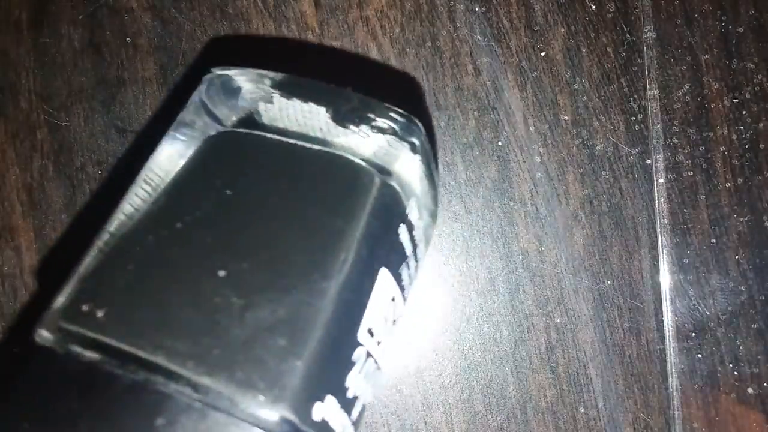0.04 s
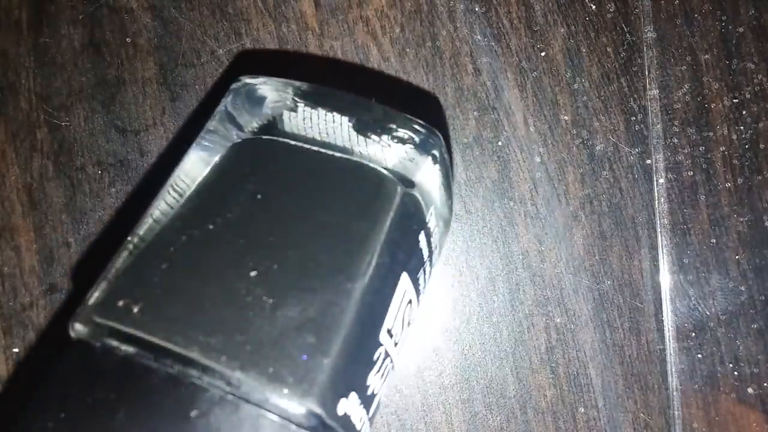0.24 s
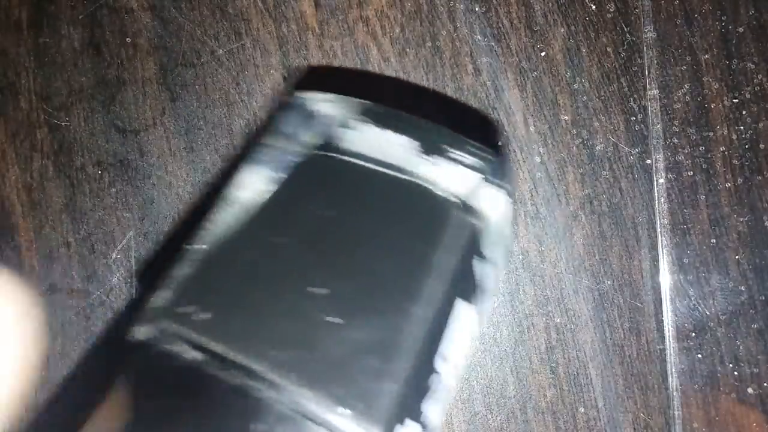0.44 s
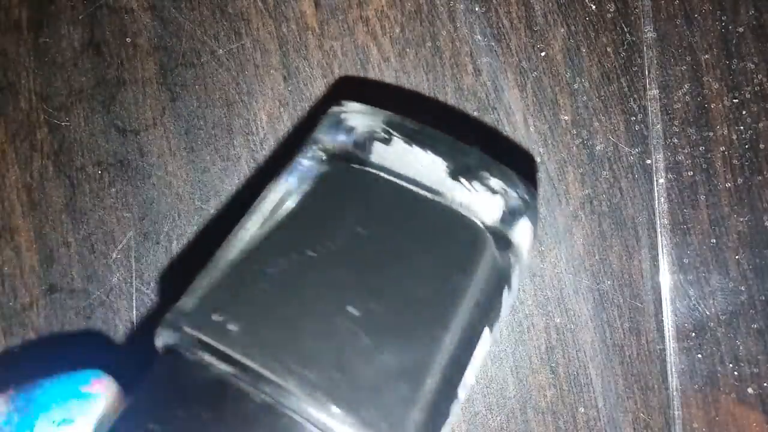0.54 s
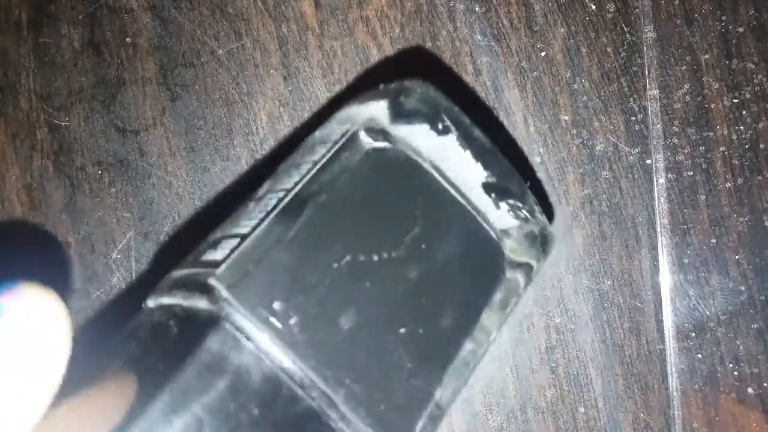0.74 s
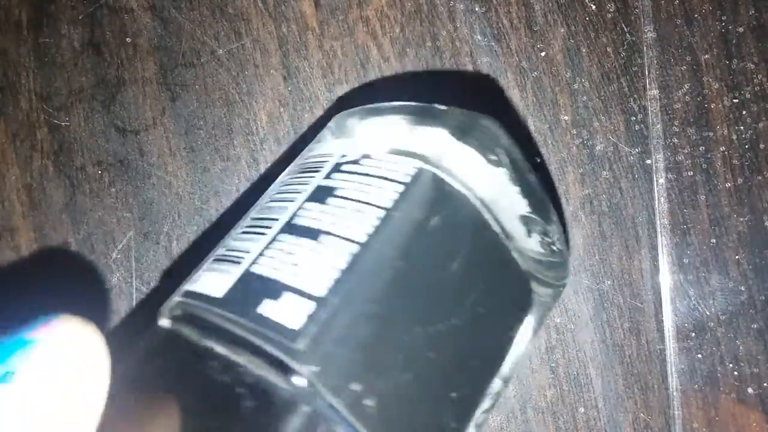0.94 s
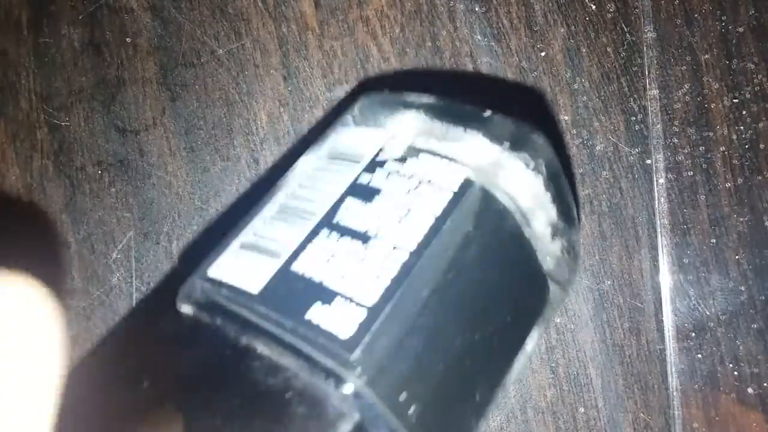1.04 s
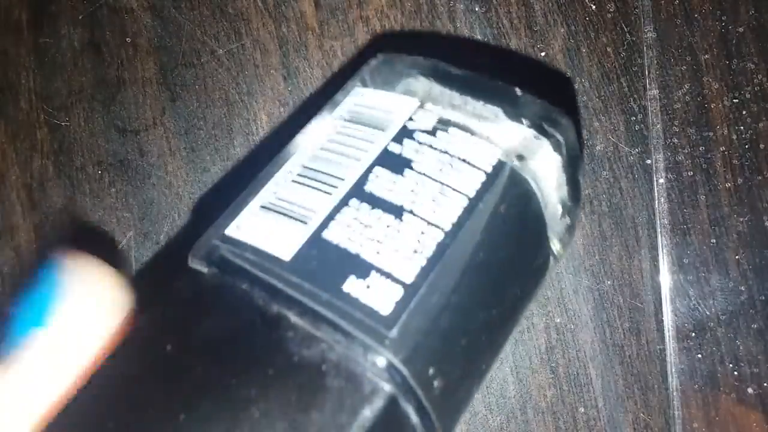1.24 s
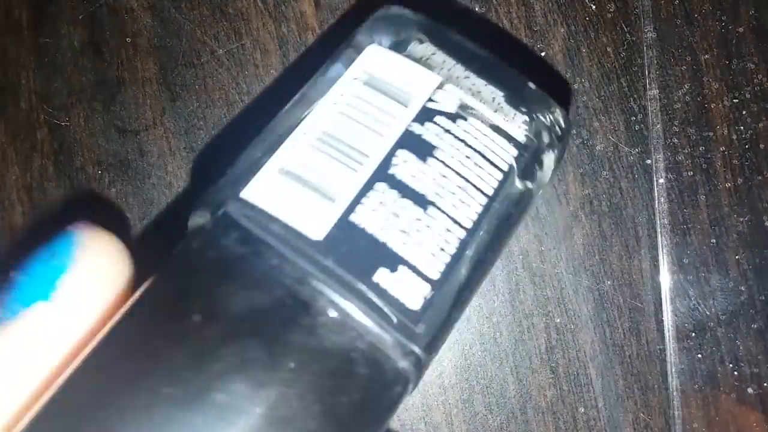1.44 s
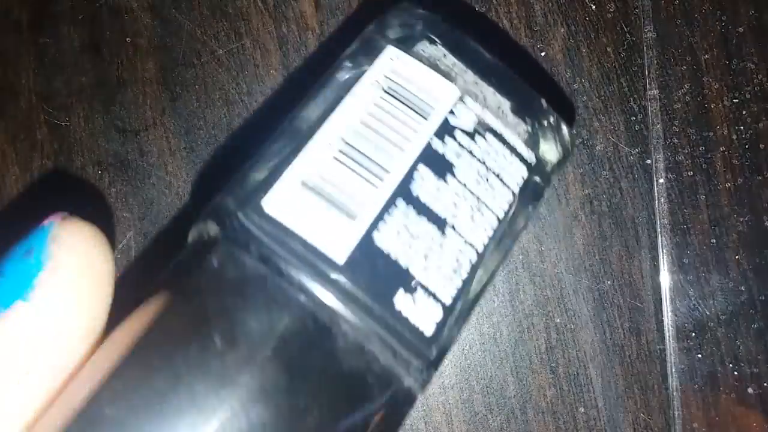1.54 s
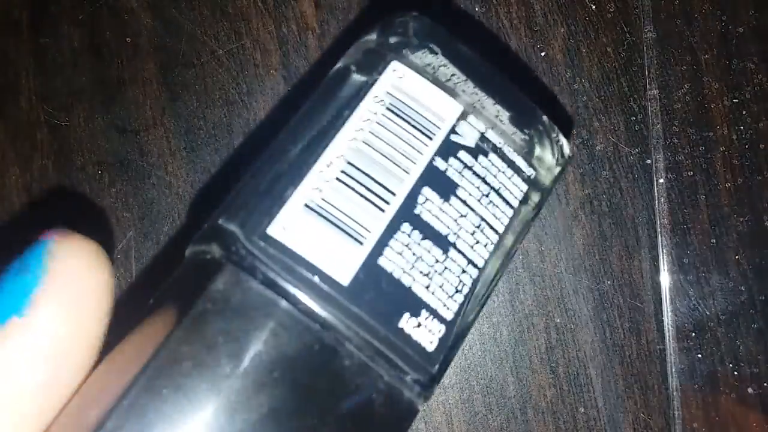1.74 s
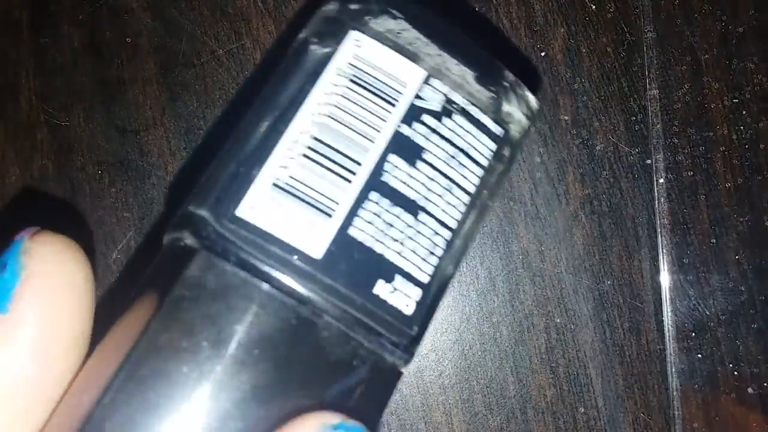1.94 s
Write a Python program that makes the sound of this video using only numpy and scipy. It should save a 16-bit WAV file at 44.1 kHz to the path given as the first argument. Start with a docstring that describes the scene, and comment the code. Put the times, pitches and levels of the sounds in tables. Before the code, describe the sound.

A small glass bottle knocks once on a wooden table, then is rolled over with soft bumps, faint scrapes and a light tick. Fingers brush close to the microphone in a quiet room with low hum.

```python
"""On a wooden table in a quiet room, close to a phone, a small glass bottle knocks once and is rolled over.
The impact and the softer bumps that follow excite the damped modes of the table top; the bottle's edge
drags by stick-slip friction and drives the same modes. Glass and fingernail tick, and fingers brush near
the left microphone. Low room noise, mains hum and microphone hiss lie underneath."""
import sys
import numpy as np
from scipy import signal
from scipy.fft import rfft, irfft
from scipy.io import wavfile
from scipy.ndimage import uniform_filter1d

SR = 44100
rng = np.random.default_rng(int(sys.argv[2]) if len(sys.argv) > 2 else 0)


def generate_wav(signal):
    """Clip the signal to [-1, 1] and save it as 16-bit WAV at the path in sys.argv[1]."""
    frames = np.transpose(np.atleast_2d(signal))
    scaled = np.clip(frames, -1, 1) * 32767
    pcm = np.round(scaled).astype(np.int16)
    wavfile.write(sys.argv[1], SR, pcm)


N = 88200
TIME = np.arange(N) / SR


def undb(db):
    """Amplitude ratio for a level in decibels."""
    return 10 ** (np.asarray(db) / 20)


def unit(x):
    """Normalisation to an rms of 1."""
    return x / np.sqrt(np.mean(x ** 2))


def pan(db):
    """Channel gains for a level difference, left minus right."""
    return undb(np.array([[db], [-db]]) / 2)


def colour(x, points, tilt_db=0):
    """Spectral shaping by (Hz, dB) points and a tilt per octave; the result has an rms of 1."""
    octave = np.log2(np.maximum(np.fft.rfftfreq(N, 1 / SR), 1))
    hz, db = np.array(points).T
    knots = np.log2(hz)
    gain_db = np.interp(octave, knots, db) + tilt_db * np.clip(octave, knots[0], knots[-1])
    return unit(irfft(rfft(x) * undb(gain_db), N))


def noise():
    """Two uncorrelated channels of white noise."""
    return rng.standard_normal((2, N))


def fade(t60, start=0):
    """Exponential decay from a start time, falling 60 dB in t60 seconds."""
    age = TIME - start
    return (age >= 0) * np.exp(-np.log(1000) * np.abs(age) / t60)


def wander(rate_hz):
    """Smoothed random fluctuation with a spread near 1."""
    hold = int(SR / rate_hz)
    steps = np.repeat(rng.standard_normal(N // hold + 1), hold)
    return uniform_filter1d(steps, hold)[:N]


def delay(x, seconds):
    """Propagation delay of one channel."""
    return np.interp(TIME - seconds, TIME, x, left=0)


def ring(force, response):
    """Linear response: the force convolved with a stereo impulse response."""
    return signal.fftconvolve(np.atleast_2d(force), response, axes=1)[:, :N]


def room():
    """Low noise and slightly wavering mains hum, almost fully coherent between the two microphones."""
    # Each row: frequency in Hz, relative level in dB.
    rumble_spectrum = [(25, -44), (45, -2), (70, 0.5), (100, -0.5), (150, -4), (200, -1.5), (380, -1.5),
                       (500, -4), (650, -18.5), (1000, -47.5), (2000, -44.5), (4000, -44.5)]
    # Each row: frequency in Hz, level in dB about which the tone wavers.
    hum_tones = [(120, -63), (240, -67.5), (422, -84.5), (505, -75)]
    mid, side = colour(noise(), rumble_spectrum)
    rumble = undb(-59.5) * (mid + undb(-14) * side * np.array([[1], [-1]]))
    waver_db, waver_rad = 4.5, .39
    hum = 0
    for hz, db in hum_tones:
        amplitude = np.sqrt(2) * undb(db + waver_db * wander(rate_hz=8))
        hum = hum + amplitude * np.sin(2 * np.pi * hz * TIME + waver_rad * wander(rate_hz=5.77))
    return (rumble + hum) * pan(1.5)


def microphone_hiss():
    """Self-noise, independent in each microphone; the left is brighter and its level dips twice."""
    # Each row: frequency in Hz, relative level on the left in dB, the same on the right.
    hiss_spectra = [(463, 13, 21.5), (2270, -0.5, 5), (3060, -4.5, 2), (5470, -8.5, -0.5), (7660, -5.5, 0),
                    (8700, 2.5, 2), (9840, -2.5, -9), (11200, -1.5, 8.5), (11300, -1.5, -1.5),
                    (13450, -6, -3), (14900, -1.5, 1)]
    # Each row: time in seconds, gain of the left hiss in dB.
    left_contour = [(0, 10.5), (.06, 2), (.13, 3), (0.219, 7), (1.24, 7.5), (1.31, 2.5), (1.62, 2.5),
                    (1.66, 5), (2, 6)]
    spectra = np.array(hiss_spectra)
    left_db, right_db = -74 + np.interp(TIME, *np.array(left_contour).T), -69
    left, right = noise()
    return np.array([undb(left_db) * colour(left, spectra[:, [0, 1]]),
                     undb(right_db) * colour(right, spectra[:, [0, 2]])])


def table_top():
    """Impulse response by modal superposition, with a thud, a wall reflection and faint reverberation."""
    # Each row: frequency in Hz, level in dB, 60 dB decay time in seconds, left minus right in dB.
    table_modes = [(120, -15, .17, 2), (185, -1.4, .02, 2), (240, -21, .14, 2), (322, -19, .15, 6),
                   (372, -5.4, .17, 3.3), (460, -.4, .076, 1.3), (507, -1.5, .125, 5), (577, -3.3, .085, 4),
                   (672, -16, .17, -5), (736, -7, .08, -7), (805, -15, .17, 4), (945, .5, .027, 12),
                   (981, 0, .055, 10.6), (1064, 6, .025, -6.7), (1153, 1.8, .06, -7.5),
                   (1270, -1, .035, 12), (1434, -5.5, .11, 1), (1514, .5, .044, -12), (1625, 1, .026, 12),
                   (1695, -5, .07, -6)]
    # The dense, quickly dying ring of the wood. Each row: frequency in Hz, relative level in dB.
    wood_spectrum = [(60, -12), (150, -14.5), (290, 5.5), (420, -1.5), (550, -16), (700, 7.5), (880, -8.5),
                     (1100, 2), (1550, -3.5), (1850, -6), (2100, 7), (3000, -12.5), (5000, -47)]
    thud_hz, coherent_below_hz = 465, 400
    wall_delay_s, right_lag_s = .0137, .00023  # the right microphone is farther from the contact
    modes = sum((-1) ** k * undb(db) * pan(balance_db) * fade(t60) * np.sin(2 * np.pi * hz * TIME)
                for k, (hz, db, t60, balance_db) in enumerate(table_modes))
    thud = undb(8.5) * fade(t60=.03) * np.sin(2 * np.pi * thud_hz * TIME)
    direct = -(modes + thud)
    reflection = undb(-8.5) * np.array([delay(channel, wall_delay_s) for channel in direct])
    mid, side = colour(noise(), wood_spectrum)
    side = signal.sosfilt(signal.butter(1, coherent_below_hz, "high", fs=SR, output="sos"), side)
    wood_decay, room_decay = undb(-4.5) * fade(t60=.11), undb(-14) * fade(t60=.34)
    dense = unit(np.array([mid + side, mid - side])) * (wood_decay + room_decay)
    left, right = direct + reflection + dense
    return np.array([left, delay(right, right_lag_s)])


def knocks(table):
    """Impact: each contact is a half-sine force pulse; the longer it lasts, the duller it sounds."""
    # One hard knock, then soft bumps as the bottle tips over its edges.
    # Each row: start in seconds, impulse level in dB, contact time in seconds.
    contacts = [(.2108, -29.1, .00066), (.387, -50, .002), (.4905, -48, .0011), (.7865, -48, .0017),
                (.807, -47, .0019), (.937, -48, .002), (1.0595, -45, .0017), (1.385, -43.5, .0014),
                (1.428, -51, .0017)]
    force = 0
    for start, db, contact_s in contacts:
        pulse = np.sin(np.pi * np.clip((TIME - start) / contact_s, 0, 1))
        force = force + undb(db) * pulse / pulse.sum()
    return ring(force, table)


def ticks():
    """Light impacts of glass and fingernail: bright noise in exponential decay."""
    # Each row: start in seconds, level in dB, 60 dB decay time in seconds.
    taps = [(0.213, -69.5, 0.076), (1.0467, -50, 0.013)]
    # Each row: frequency in Hz, relative level in dB.
    tick_spectrum = [(2000, -24), (4000, -9), (5600, -9), (7200, 0), (9000, -6), (12000, -20), (16000, -24)]
    bursts = sum(undb(db) * fade(t60, start) * colour(noise(), tick_spectrum) for start, db, t60 in taps)
    return bursts * undb([[0], [-9]])  # weaker on the right


def edge_drags(table):
    """Stick-slip friction: the bottle's edge rings the table with irregular soft pulses and adds grit."""
    # Each row: start and length in seconds, level in dB, band centre in Hz, relative grit level in dB.
    drags = [(0.462, 0.014, -45, 346, -23), (0.486, 0.01, -50.5, 362, -15), (0.508, 0.011, -60.5, 320, -7),
             (0.664, 0.056, -52.5, 476, -40), (0.774, 0.033, -56, 538, -20), (0.808, .034, -50, 367, -25),
             (0.86, 0.021, -54, 480, -19.5), (1.061, 0.045, -48.5, 424, -29),
             (1.092, 0.048, -50, 483, -17.5), (1.256, 0.041, -58, 450, -25), (1.343, 0.114, -54, 476, -18),
             (1.805, 0.023, -55, 516, -22)]
    # Each row: frequency in Hz, relative level in dB.
    grit_spectrum = [(500, -15), (800, -20), (1000, 6), (1170, 5.5), (1350, -31), (1550, -17), (2000, -11),
                     (4000, -26.5)]
    attack_s, release_s, half_band_hz = .0054, .014, 57
    slips_per_s, scatter_db = 460, 1
    friction = 0
    for start, length, db, hz, grit_db in drags:
        attack = np.clip((TIME - start) / attack_s, 0, 1)
        pressure = attack * np.exp(-np.maximum(TIME - start - length, 0) / release_s)
        slipping = rng.random(N) < slips_per_s / SR
        slips = slipping * undb(scatter_db * rng.standard_normal(N)) * pressure
        band = signal.butter(2, [hz - half_band_hz, hz + half_band_hz], "band", fs=SR, output="sos")
        pulses = signal.sosfilt(band, slips + 1e-18)  # the offset keeps the rms above zero
        body = unit(unit(pulses) + .93 * unit(ring(pulses, table)))
        grit = unit(colour(noise(), grit_spectrum) * pressure)
        pressure_rms = np.sqrt(np.mean(pressure ** 2))
        friction = friction + undb(db) * pressure_rms * (body + undb(grit_db) * grit)
    return friction * pan(5)


def finger_brushes():
    """Friction noise of sliding skin, in soft Gaussian swells near the left microphone."""
    # Each row: peak time and standard deviation in seconds, level in dB, tilt in dB per octave.
    strokes = [(0.731, 0.061, -67, -11), (0.732, 0.03, -64, 4), (0.91, 0.039, -67, 11),
               (1.062, 0.046, -70, -9), (1.108, 0.029, -71, -12.5), (1.175, 0.024, -69.5, -8),
               (1.672, 0.021, -71.5, 10)]
    # Each row: frequency in Hz, relative level in dB.
    skin_spectrum = [(1000, -38), (2100, -5), (2700, -11), (4000, -1.5), (5500, -4.5), (7000, 3.5),
                     (8300, 5), (10000, -0.5), (12500, -9), (15000, -5.5)]
    skin = 0
    for peak, width, db, tilt_db in strokes:
        swell = np.exp(-((TIME - peak) / width) ** 2 / 2)
        skin = skin + undb(db) * swell * colour(noise(), skin_spectrum, tilt_db)
    return skin * undb([[0], [-10.5]])


def scene():
    """Superposition of the background and the bottle's sounds; knocks and drags share one resonator."""
    background = room() + microphone_hiss()
    table = table_top()
    return background + knocks(table) + ticks() + edge_drags(table) + finger_brushes()


def record(dry):
    """Band limiting: the phone drops the deepest bass and cuts the top steeply."""
    low_cut_hz, high_cut_hz = 41, 15750
    thinned = signal.sosfilt(signal.butter(4, low_cut_hz, "high", fs=SR, output="sos"), dry)
    return signal.sosfilt(signal.ellip(12, .2, 70, high_cut_hz, fs=SR, output="sos"), thinned)


dry = scene()
out = record(dry)
generate_wav(out)
```